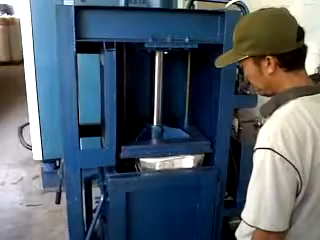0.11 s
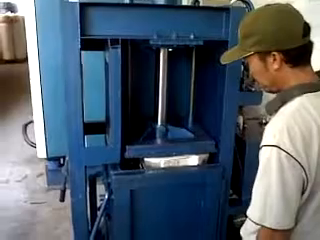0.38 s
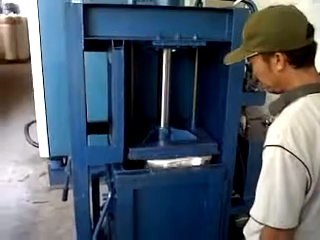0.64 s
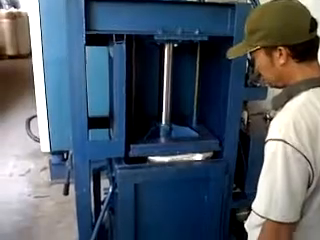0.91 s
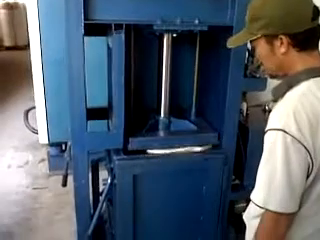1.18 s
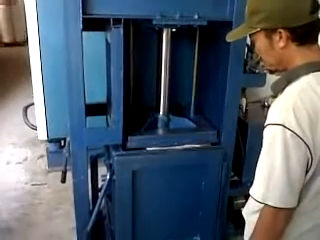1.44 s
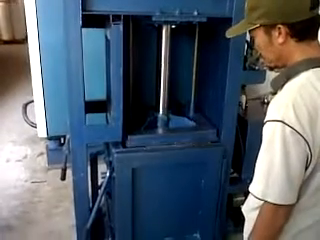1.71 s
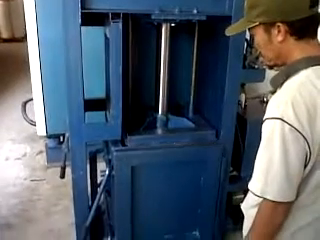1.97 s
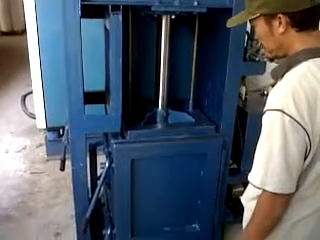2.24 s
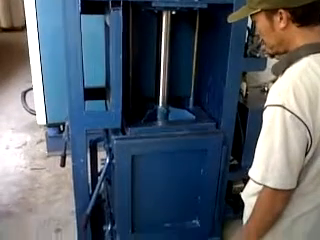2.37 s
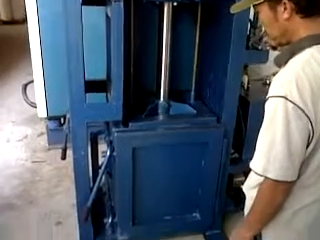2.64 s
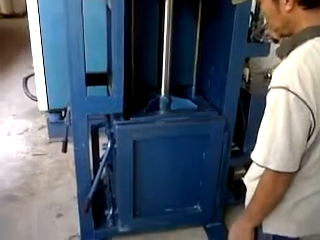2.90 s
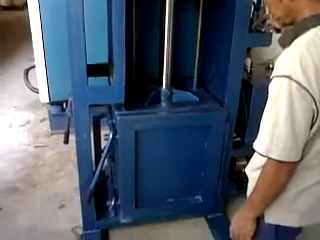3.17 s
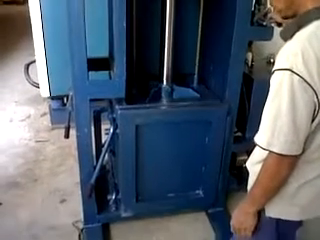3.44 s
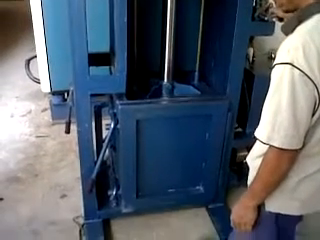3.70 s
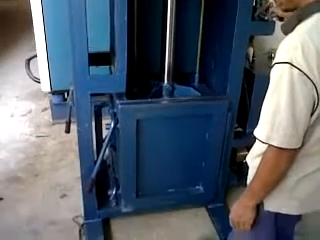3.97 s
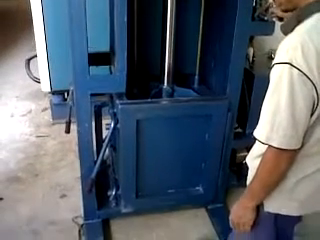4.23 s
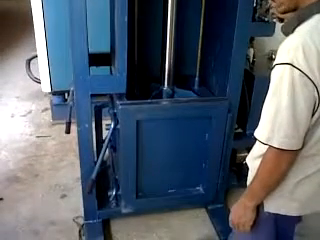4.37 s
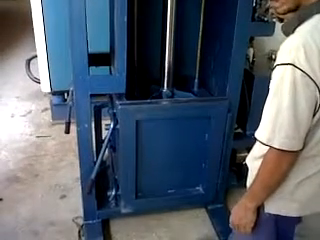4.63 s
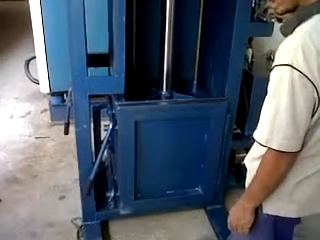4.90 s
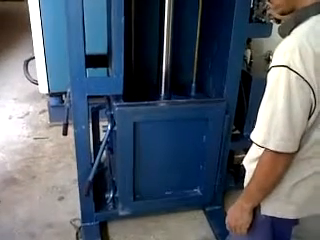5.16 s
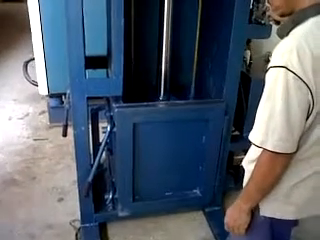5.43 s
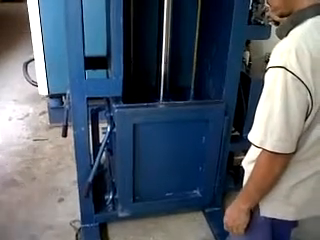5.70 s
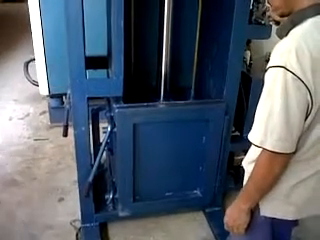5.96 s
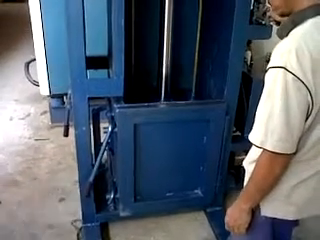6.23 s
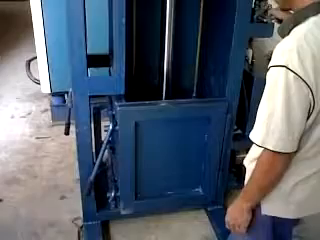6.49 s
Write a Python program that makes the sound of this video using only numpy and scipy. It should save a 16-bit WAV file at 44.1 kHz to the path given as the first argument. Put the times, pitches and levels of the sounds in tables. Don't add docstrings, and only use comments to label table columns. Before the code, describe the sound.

A hydraulic press crushes a large tin can with two bursts of metallic crunching, while its pump roars and whines steadily underneath.

```python
import sys
import numpy as np
from scipy import signal
from scipy.fft import rfft, irfft
from scipy.io import wavfile
from scipy.ndimage import uniform_filter1d

SR = 44100
rng = np.random.default_rng(int(sys.argv[2]) if len(sys.argv) > 2 else 0)


def master(y):
    cut = np.clip(np.atleast_2d(y).T, -1, 1)
    pcm = np.round(cut * 32767)
    wavfile.write(sys.argv[1], SR, pcm.astype(np.int16))


def to_linear_factor(level_db):
    exponent = np.asarray(level_db, float) / 20
    return 10 ** exponent


N = 291501
TIME = np.arange(N) / SR
MID_STROKE_S = 3.3
GEAR_MESH_HZ = 478.75

# time_s, level_db
MACHINE_LEVEL = [(0.0, -25.5), (0.18, -27.5), (0.26, -28), (0.33, -17.5), (0.41, -24.5), (0.5, -23.5),
                 (0.55, -26.5), (0.66, -26.5), (0.74, -32), (0.96, -35.5), (3.0, -36), (3.9, -38.5),
                 (4.32, -31.5), (4.45, -22), (4.58, -27), (5.18, -27), (5.45, -38), (6.61, -36.5)]
# time_s, rise_db, half_length_s
SURGES = [(1.123, 2.5, 0.042), (1.44, 2.5, .04), (1.32, 0.5, .02), (1.645, 2.5, 0.057), (1.841, 1.5, 0.086),
          (2.16, 2, 0.088), (2.54, 2, 0.097), (2.8, 1, .1), (3.081, 1.5, 0.029), (3.358, 2, 0.072),
          (3.49, -0.5, 0.033), (3.66, 2.5, .1), (3.85, 3, .03), (3.93, -2, .05), (4.05, 0.5, .06),
          (4.24, 5, 0.056), (4.7, 2.5, 0.099), (5.037, 2, 0.055), (5.51, 2, 0.042), (5.678, 2, 0.04),
          (5.76, -1.5, .04), (5.83, 3.5, 0.024), (5.88, 4.5, 0.042), (5.96, 2.5, 0.016), (6.045, 4.5, 0.04),
          (6.178, 2, .035), (6.308, 4, 0.049), (6.4, 2, .02), (6.525, 2, 0.027)]
# freq_hz, density_db (per Hz)
ROAR_COLOUR = [(25, -23), (60, -11), (100, -6.5), (200, 0), (270, 1.5), (400, 1), (520, -4), (750, -1),
               (1100, -4.5), (1450, 0.5), (1700, -2.5), (2300, 1.5), (2800, -2.5), (4000, -2), (5200, -0.5)]
# time_s, rise_db, half_length_s
GROANS = [
    (.29, 4, .06),
    (1.42, 2, .08),
    (1.84, 4.5, .05),
    (2.76, 3, .07),
    (4.9, 6.5, .07),
    (5.36, 2, .1),
]
# multiple, level_db (over the machine)
GEAR_ORDERS = [(1, -17), (2, -16), (3, -17.5), (4, -15), (5, -6), (6, -11)]
SIDEBAND_HZ = 2536.7, 2251.2
SIDEBAND_DB = [-20.5, -15]
VANE_HZ = 592.3, 886, 1456, 1748
VANE_DB = [-16.5, -20, -13, -14]
OTHER_LINE_HZ = 247.7, 296.2, 814, 1055, 1114, 1238, 1319, 2012, 2046, 2298, 2667, 2371, 2346
OTHER_LINE_DB = [-16.5, -17.5, -23, -23.5, -21, -25.5, -33.5, -24.5, -24, -18, -23, -17, -20]
# offset_db, climb_db_per_s, echo_share (0-1), beat_s, in_phase_s
ECHO_PATHS = [(1.06, 2, 0.2, 1.01, 3.7), (0.05, 1.56, 0.7, 9.0, 0.85), (-0.6, -0.35, 0, 5.4, 3.3),
              (3.05, -0.56, 0.1, 9.4, 1.3), (-0.64, 0.5, 0.49, 4.33, 3.93), (-8, -1.3, 0.8, 4.22, 1.81),
              (2, 1.7, 0.45, 5.1, 2.87), (1, 0.15, 0.3, 4.8, 6.4), (2.5, 1.23, 0.7, 4.2, 3.96),
              (1.5, 1.8, 0.5, 7.57, 7.47), (-3, 0.3, 0.27, 4.9, 4.47), (-3, 2, 0.25, 4.5, 7.1)]
# time_s, rise_db, half_length_s
WHINES = [
    (4.46, 4, .12),
    (4.68, 2.5, .08),
    (1.1, 2.5, .2),
    (2.3, 2.5, 0.16),
]
# start_s, peak_db, main_panel_hz, second_panel_hz, second_panel_db
FOLDS = [(.035, -9.5, 1333, 600, -8.5), (.042, -10, 1502, 796, -7.5), (.057, -12.5, 1413, 700, -3.5),
         (.116, -10.5, 1567, 1130, -8), (.12, -10, 1717, 3040, 5), (.308, -19, 2477, 980, -6.5),
         (.365, -24, 754, 1210, -6), (.475, -18.5, 246, 502, -13.5), (.496, -12, 1325, 909, -6),
         (.495, -12, 1983, 2850, -16), (.66, -33.5, 1500, 2750, 11), (.776, -22.5, 274, 3100, -18),
         (.286, -19, 2400, 1520, -9), (0.44, -18, 2320, 2900, -8), (.509, -12.5, 1877, 1000, -0.5)]
# start_s, peak_db, main_panel_hz, second_panel_hz, second_panel_db
CRUMPLES = [(4.528, -18.5, 944, 1900, -7), (4.445, -21.5, 1470, 2040, -4), (4.08, -27, 3030, 1666, -3.5),
            (4.132, -22.5, 1495, 284, -8), (4.198, -7.5, 2015, 1654, -3.5), (4.199, -16.5, 2830, 3080, -1),
            (4.271, -20, 2570, 1564, 1.5), (4.395, -14, 1431, 910, -6.5), (4.417, -18.5, 1513, 703, -6),
            (4.505, -18, 587, 930, -13), (4.652, -16.5, 2106, 1970, -6), (4.698, -15, 2250, 1536, -2),
            (5.021, -17.5, 1340, 890, -4.5)]
# start_s, peak_db, main_panel_hz, second_panel_hz, second_panel_db
DENTS = [(1.49, -24, 247, 1490, -5), (1.825, -24.5, 300, 1160, -6.5), (1.911, -24.5, 1460, 432, -6),
         (2.34, -29, 1980, 1530, -0.5), (2.525, -28.5, 2660, 2420, 0), (2.574, -26, 790, 956, -14.5),
         (3.049, -23, 1300, 1805, -6), (3.08, -38, 1320, 1143, 5), (3.166, -20.5, 340, 683, -6),
         (3.306, -26, 1490, 1900, -6), (3.586, -27.5, 1480, 2010, -4), (3.826, -26.5, 590, 1470, 0.5),
         (3.86, -25.5, 1810, 1220, -6.5), (5.524, -22, 1427, 2190, -13), (5.662, -29.5, 258, 580, -2),
         (5.678, -27, 2660, 1970, 1.5), (5.688, -25, 880, 658, 0), (5.8, -30, 3020, 2320, -7),
         (5.86, -27, 1820, 936, -3), (5.903, -25.5, 2370, 1590, -3), (6.028, -25, 1540, 2310, -3.5),
         (6.174, -20.5, 3044, 1040, -6.5), (6.192, -29.5, 996, 790, 0), (6.29, -22, 2030, 2660, -3)]
# start_s, level_db
SPLASHES = [(0.034, -19), (0.118, -8.5), (0.3, -23.5), (0.496, -23.5), (4.528, -30), (5.02, -29.5),
            (3.86, -36.5), (4.198, -13), (4.698, -23), (5.523, -34), (5.68, -30), (5.8, -35),
            (6.034, -36.5), (6.173, -35.5), (6.294, -42)]
# freq_hz, gain_db
MIC_RESPONSE = [(2600, -0.5), (3000, -6.5), (3500, -21), (4000, -31), (4600, -38.5), (5100, -46.5),
                (5350, -67), (6000, -94.5)]
KNOCKS = [*FOLDS, *CRUMPLES, *DENTS]


def evened(x):
    return x / np.sqrt(np.mean(x ** 2))


def read(points, hz):
    f, value = np.transpose(points)
    return np.interp(np.log(hz + 1), np.log(f + 1), value)


def level_at(t):
    time_s, level_db = np.transpose(MACHINE_LEVEL)
    return np.interp(t, time_s, level_db)


def swells(rows, t):
    return sum(db * np.exp(-((t - s) / half) ** 2) for s, db, half in rows)


def machine_db(t):
    return level_at(t) + swells(SURGES, t)


def drift(rate_hz):
    f = np.geomspace(rate_hz / 6, rate_hz, 12)[:, None]
    waves = np.sin(2 * np.pi * (f * TIME[::64] + rng.random((12, 1))))
    slow = (waves / np.sqrt(f)).sum(0)
    return np.interp(TIME, TIME[::64], evened(slow))


def roar(patchy_db=2.46, flicker_db=0.9):
    frames, hz = N // 128 + 5, np.fft.rfftfreq(512, 1 / SR)[:, None]
    t = np.arange(frames) * 128 / SR
    late = t - MID_STROKE_S
    a, b, patches = rng.standard_normal((frames, 257, 3)).T
    patches = evened(uniform_filter1d(uniform_filter1d(patches, 5, 0), 12, 1))
    flicker = evened(uniform_filter1d(rng.standard_normal(frames), 8))

    fizz_db = -1.03 * late / (1 + (3300 / (hz + 1)) ** 10)
    low = 1 / (1 + (hz / 356) ** 6)
    swing_db = 0.8 * np.resize(drift(4)[::128], frames)
    rumble_db = low * (swing_db + swells(GROANS, t) - 0.24 * late)

    z = (a + 1j * b) * to_linear_factor(patchy_db * patches + flicker_db * flicker + rumble_db + fizz_db)
    white = signal.istft(z, nperseg=512, noverlap=384)[1][:N]
    full_hz = np.fft.rfftfreq(N, 1 / SR)
    colour = to_linear_factor(read(ROAR_COLOUR, full_hz)) * (full_hz < 6500)
    return to_linear_factor(-6) * np.sqrt(SR / 6000) * irfft(rfft(evened(white)) * colour, N) * 2


def tone(hz, db, waver_db=2.5, sway_rad=0.35):
    flutter = drift(60) - 0.5 * drift(5)
    wave = np.cos(2 * np.pi * hz * TIME + sway_rad * drift(9))
    return np.sqrt(2) * to_linear_factor(db + waver_db * flutter) * wave


def path_db(offset_db, climb_db, echo, beat_s, top_s):
    t = TIME[::64]
    turn = np.exp(2j * np.pi * (t - top_s) / beat_s)
    beat_db = 20 * np.log10(abs(1 + np.clip(echo, 0, 0.95) * turn))
    return np.interp(TIME, t, offset_db + climb_db * (t - MID_STROKE_S) + beat_db)


def pump():
    line_hz = [k * GEAR_MESH_HZ for k, _ in GEAR_ORDERS] + [*SIDEBAND_HZ, *VANE_HZ]
    line_db = [db for _, db in GEAR_ORDERS] + [*SIDEBAND_DB, *VANE_DB]
    throb_db = 4.5 * np.cos(2 * np.pi * (TIME - 3.81) / 1.2)
    whine_db = swells(WHINES, TIME)
    out = np.zeros(N)
    for hz, db, path in zip(line_hz, line_db, ECHO_PATHS):
        db = db + path_db(*path)
        if hz == VANE_HZ[0]:
            db = db + throb_db
        if hz == line_hz[4]:
            db = db + whine_db
        out += tone(hz, db)
    for hz, db in zip(OTHER_LINE_HZ, OTHER_LINE_DB):
        out += tone(hz, db)
    return out


def crackle(snaps_per_s=60, level_db=4, crunch_from_db=-30):
    busy = np.clip((level_at(TIME) - crunch_from_db) / 4, 0, 1)
    size = to_linear_factor(3.5 * np.minimum(rng.exponential(1, N), 4))
    snaps = size * (rng.random(N) < snaps_per_s / SR)
    decay = signal.lfilter([1], [1, -np.exp(-400 / SR)], snaps)
    return to_linear_factor(level_db) * busy * np.diff(rng.standard_normal(N + 1)) * decay


def panel(hz, t, draw, spread):
    offsets = np.array([0, -1, 0.74, -1.5, 2.0]) + 0.88 * (draw[:5] - 0.5)
    modes = hz * (1 + spread * offsets)[:, None]
    share = to_linear_factor(np.array([1, -5.5, -4.5, -9.5, -7.5]))[:, None]
    ring = (share * np.sin(2 * np.pi * (modes * t + draw[5:10, None]))).sum(0)
    return 0.43 * ring / np.std(ring[:500])


def fold(t, t60):
    return np.minimum(t * 500, 1) * to_linear_factor(-60 * np.maximum(t - 0.006, 0) / t60)


def can(crack_db=-10, echo_db=-10, small_t60=0.055, large_t60=0.11, splash_t60=0.12):
    t, out = np.arange(8000) / SR, np.zeros(N + 8000)
    draws = rng.random((len(KNOCKS), 20))
    cracks = rng.standard_normal((len(KNOCKS), 8001))
    for (s, db, hz, second_hz, second_db), draw, crack in zip(KNOCKS, draws, cracks):
        level_db = db - machine_db(s + 0.017)
        big = np.interp(db, [-20, -12], [0, 1])
        sound = panel(hz, t, draw[:10], 0.05 + 0.027 * big)
        sound += to_linear_factor(second_db) * panel(second_hz, t, draw[10:], 0.05 + 0.068 * big)
        sound += to_linear_factor(crack_db) * np.diff(crack) * hz / 500
        t60 = small_t60 + big * (large_t60 - small_t60)
        out[round(s * SR):][:8000] += to_linear_factor(level_db) * sound * fold(t, t60)

    for s, db in SPLASHES:
        hiss = np.diff(rng.standard_normal(8002), 2)
        level_db = db - machine_db(s + 0.0065)
        out[round(s * SR):][:8000] += 8 * to_linear_factor(level_db) * hiss * fold(t, splash_t60)

    walls = np.zeros(1200)
    walls[0] = 1
    walls[[190, 330, 520, 760, 1100]] = to_linear_factor(echo_db) * np.array([1.3, -1.1, 0.9, -0.7, 0.5])
    return signal.oaconvolve(out, walls)[:N]


def scene():
    return (roar() + pump() + crackle() + can())[None]


def ducking_db(t, share=0.23, from_db=3.5):
    dip_db = np.zeros(len(t))
    for s, db, *_ in KNOCKS:
        late = np.maximum(t - s - 0.013, 0)
        depth = np.clip(share * (db - machine_db(s) - from_db), 0, 6)
        dip_db += depth * (1 - np.exp(-late / 0.00049)) * np.exp(-late / 0.092)
    return dip_db


def skip(x, skip_s=0.1616, lost=9):
    at = round(skip_s * SR)
    at += np.argmax(abs(x[at:at + 30] - x[at - lost:at + 30 - lost]))
    x = np.concatenate([x[lost:at], x[at - lost:]])
    x[at - lost - 1:at - lost + 1] += 0.048 * np.sign(x[at - lost]) * np.array([-1, 1])
    return x


def top_cut(x):
    return signal.sosfilt(signal.butter(12, 15500, fs=SR, output="sos"), x)


def record(dry):
    t = TIME[::16]
    x = dry[0] * np.interp(TIME, t, to_linear_factor(machine_db(t) - ducking_db(t)))
    x = irfft(rfft(x) * to_linear_factor(read(MIC_RESPONSE, np.fft.rfftfreq(N, 1 / SR))), N)
    x = x * (1 + to_linear_factor(-65) * np.cos(2 * np.pi * 10600 * TIME))
    x = skip(x)
    n = np.arange(N)
    fade_in = np.minimum(0.65 + n / 200, 1)
    x = x * np.minimum((N - n) / 120, fade_in) ** 2
    x = x + to_linear_factor(-98) * rng.standard_normal(N)
    return top_cut(x[None])


dry = scene()
out = record(dry)
master(out)
```